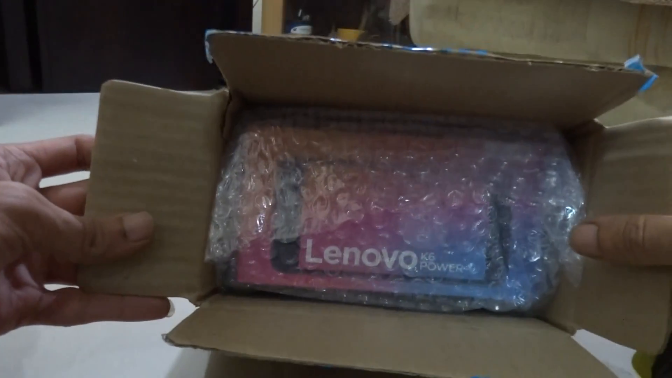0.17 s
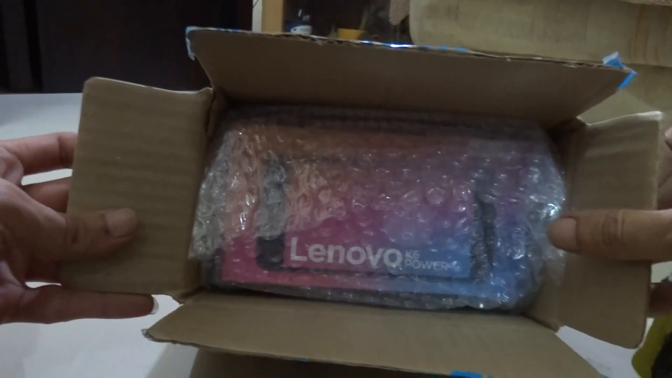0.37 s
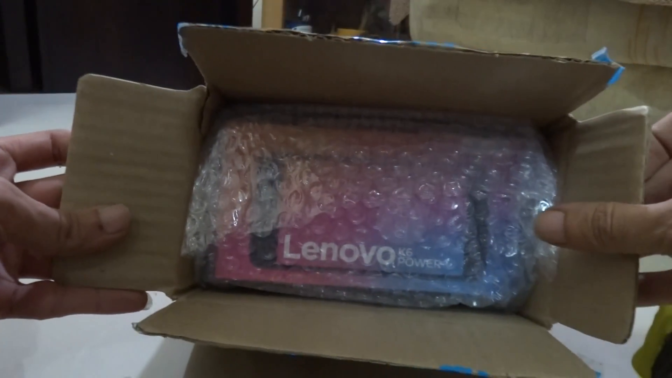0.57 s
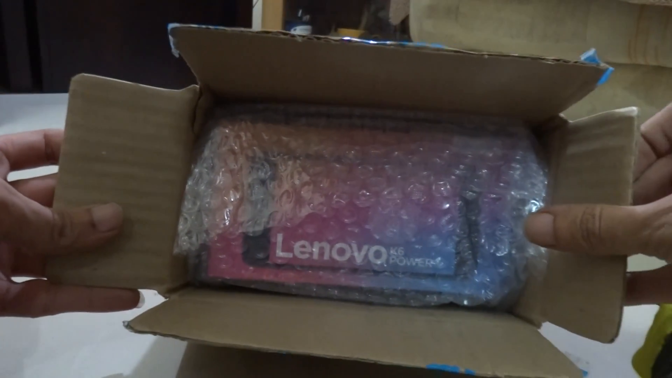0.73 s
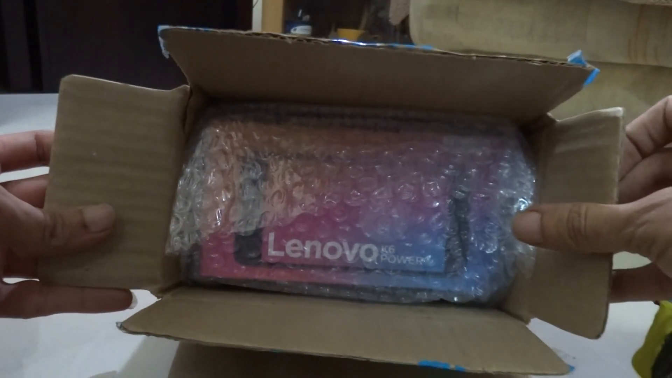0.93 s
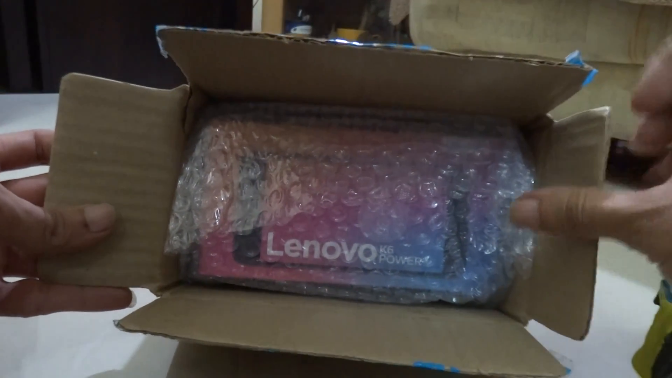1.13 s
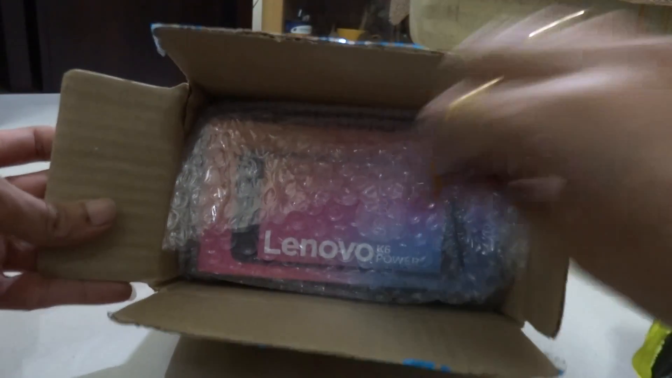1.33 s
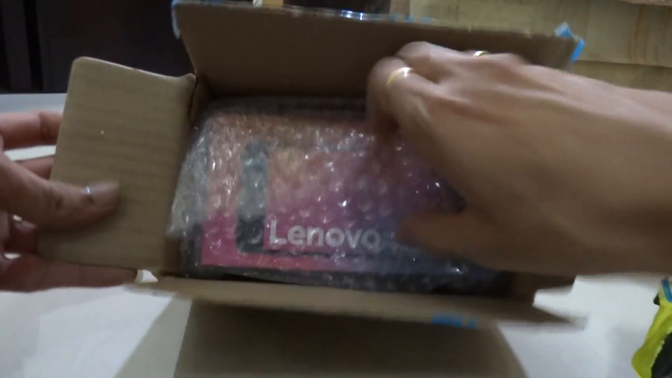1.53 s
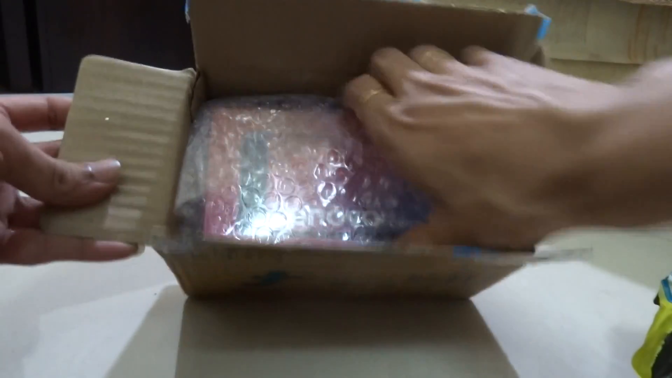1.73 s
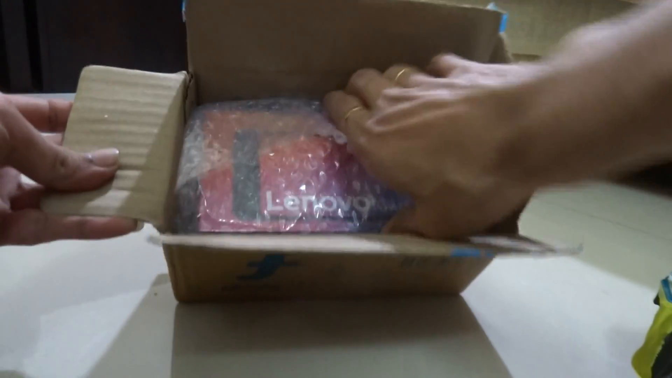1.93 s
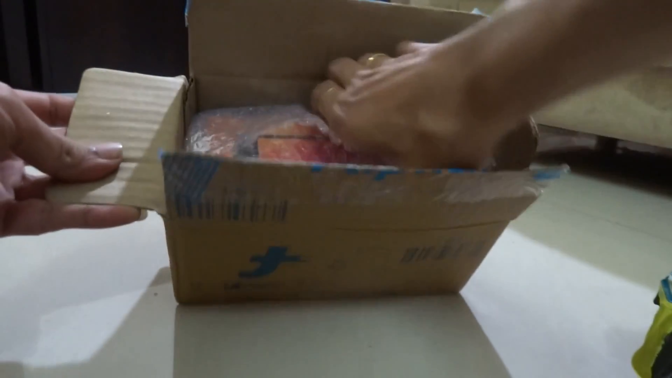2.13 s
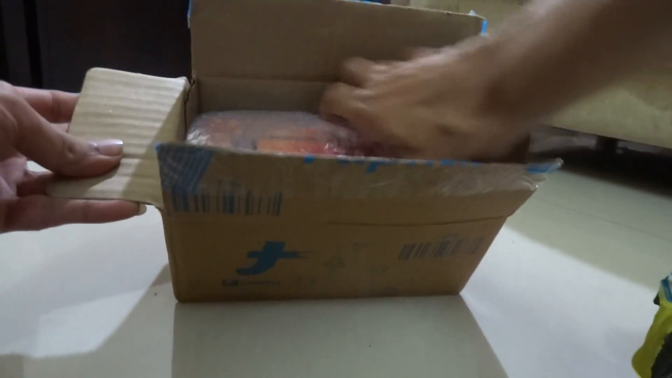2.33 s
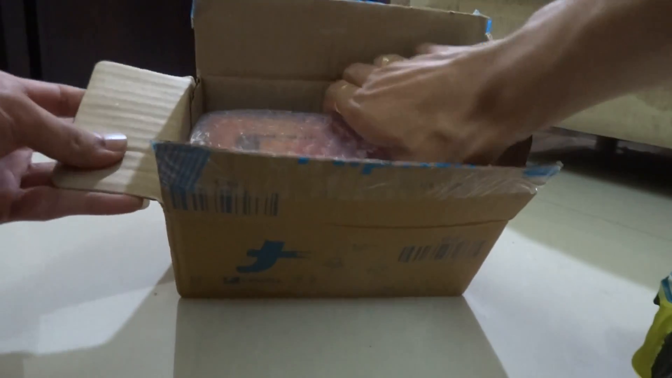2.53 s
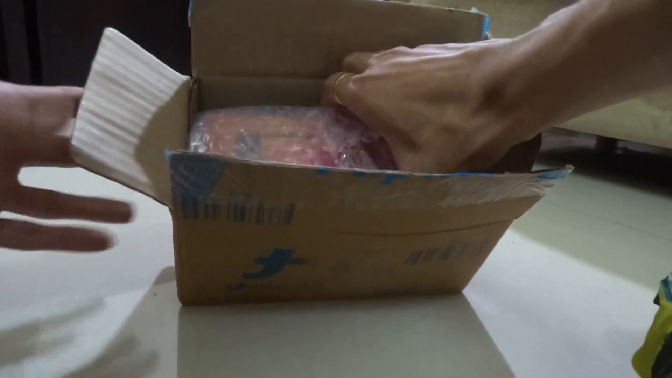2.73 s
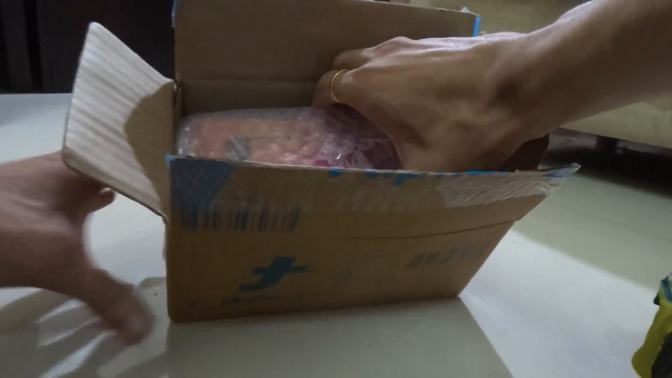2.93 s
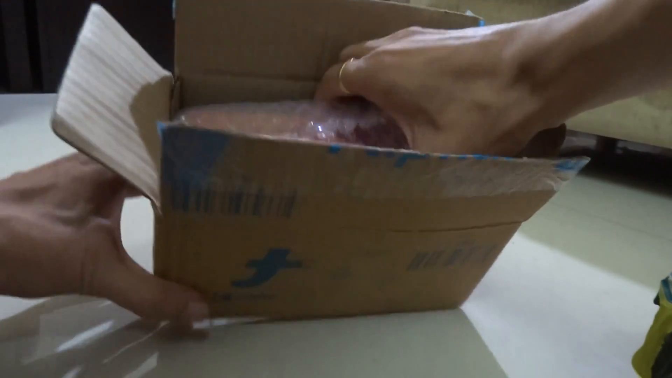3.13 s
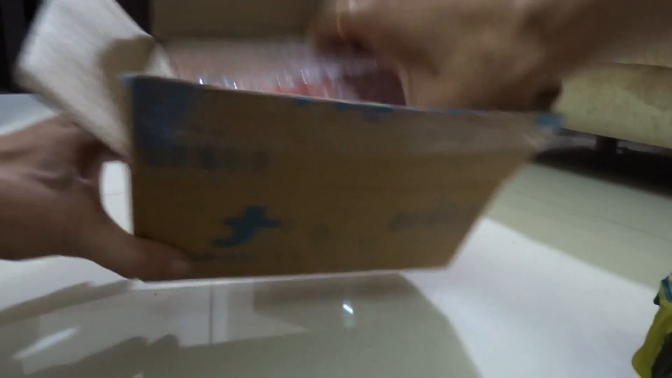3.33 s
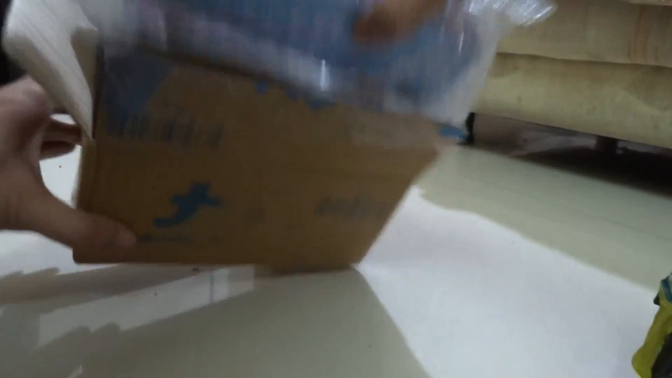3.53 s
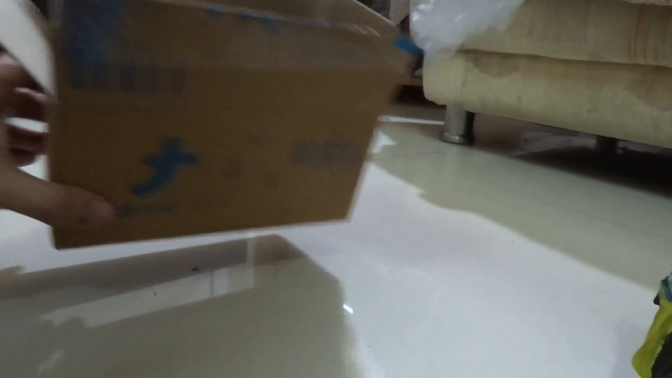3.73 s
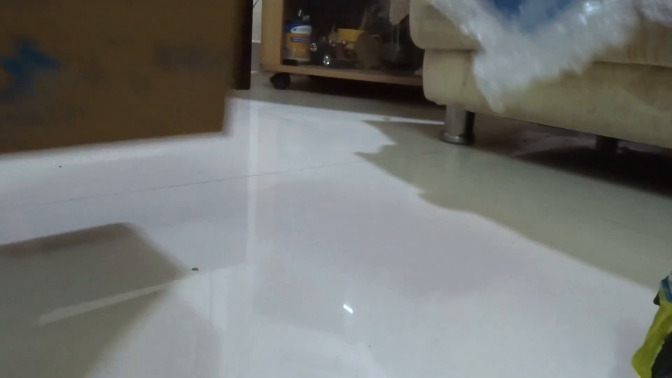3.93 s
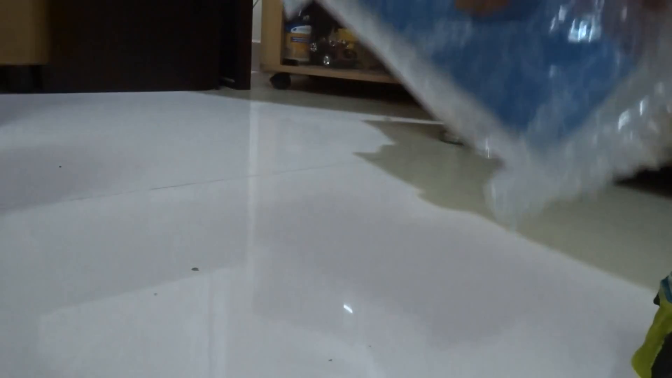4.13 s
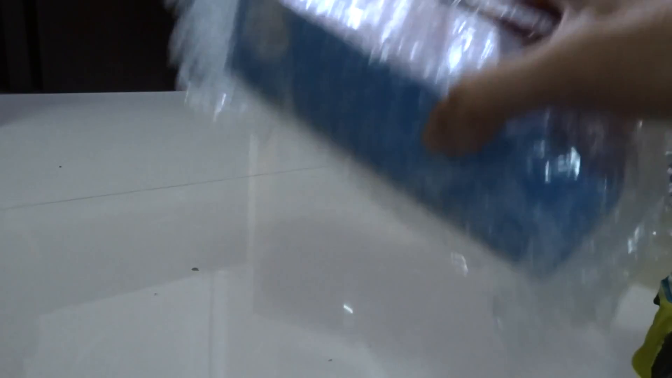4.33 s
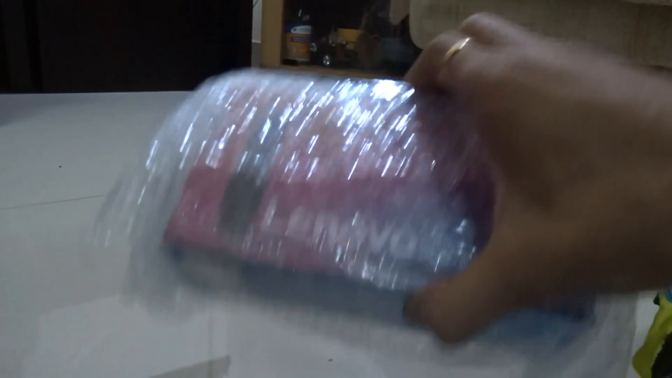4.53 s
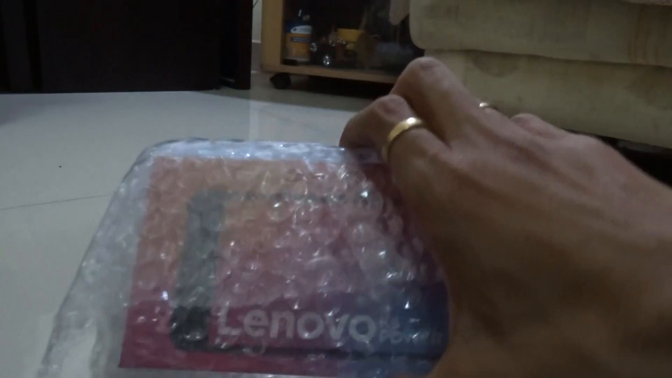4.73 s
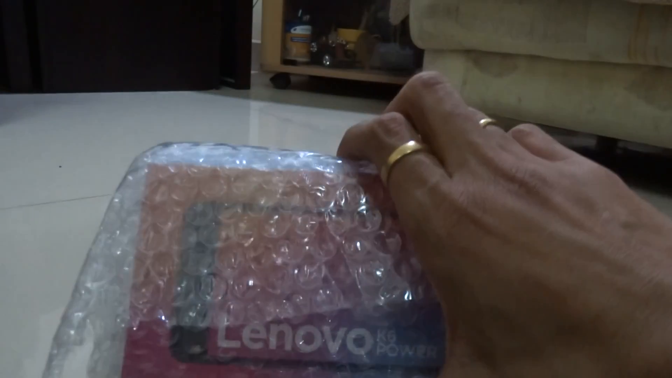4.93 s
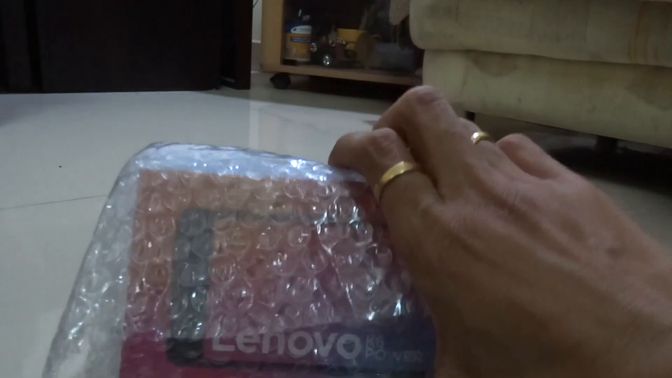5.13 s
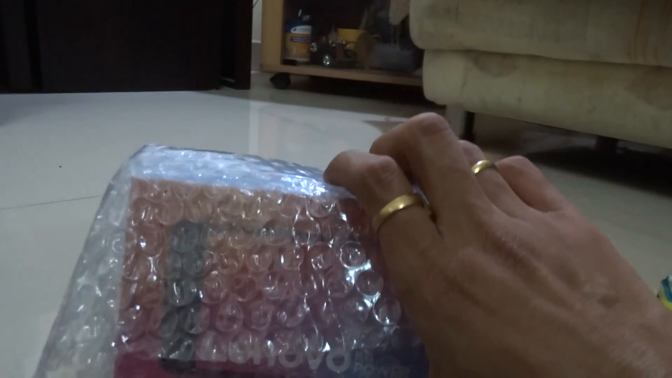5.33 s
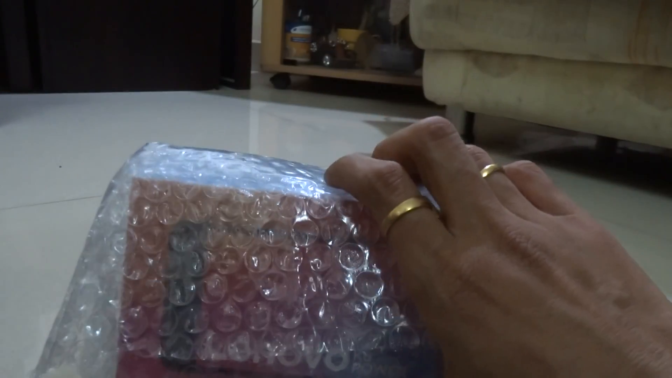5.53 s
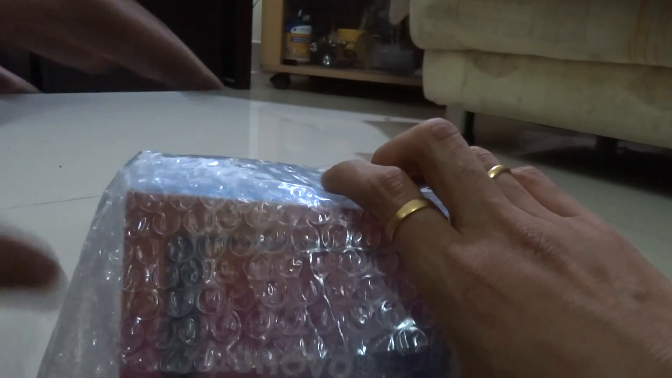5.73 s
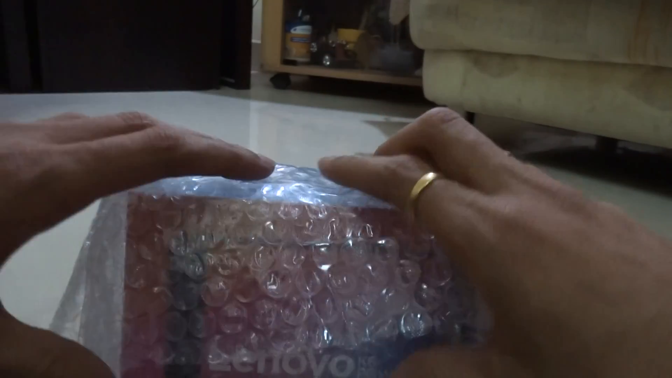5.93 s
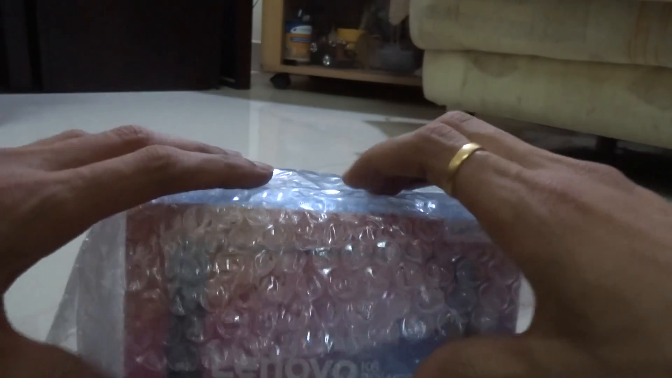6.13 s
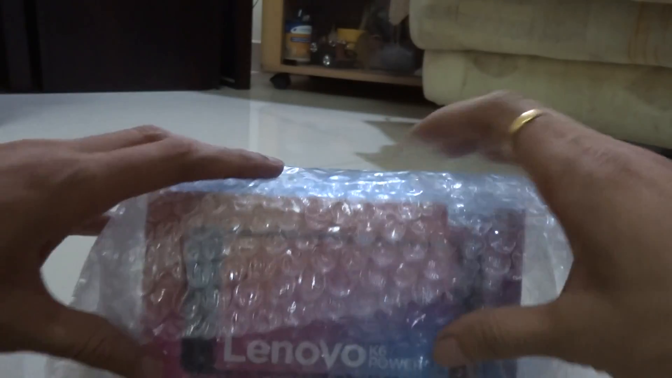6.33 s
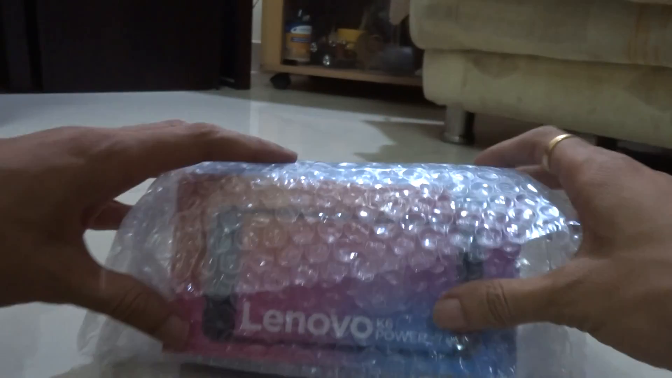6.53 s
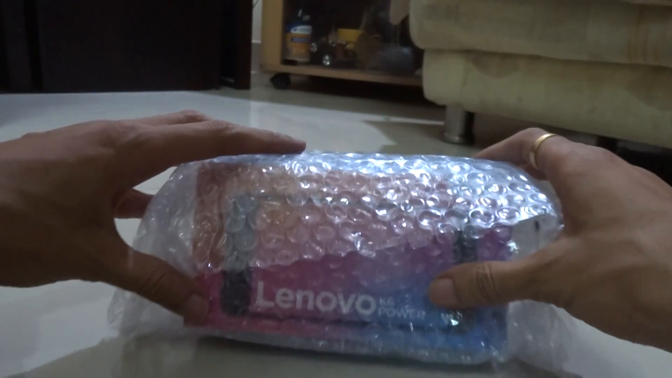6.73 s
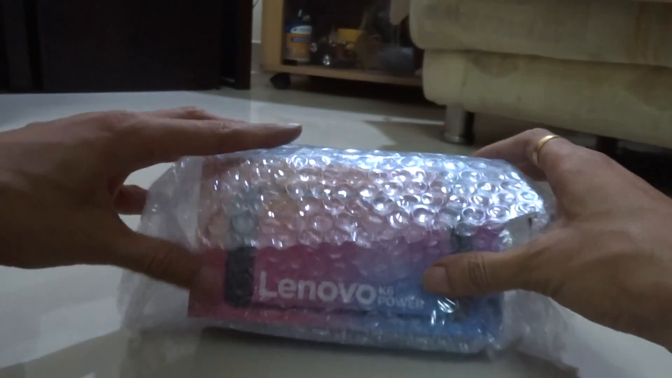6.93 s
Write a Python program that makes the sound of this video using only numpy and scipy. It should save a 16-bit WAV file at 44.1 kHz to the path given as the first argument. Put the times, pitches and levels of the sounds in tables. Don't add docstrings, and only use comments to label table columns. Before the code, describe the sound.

Bubble wrap crackles and snaps sharply as a parcel is pulled from a knocking cardboard carton, then set down on a tiled floor and turned.

```python
import sys
import numpy as np
from scipy import signal
from scipy.fft import rfft, irfft
from scipy.io import wavfile

SR = 44100
rng = np.random.default_rng(int(sys.argv[2]) if len(sys.argv) > 2 else 0)


def unload_audio(sound):
    columns = np.transpose(np.atleast_2d(sound))
    steps = np.round(np.clip(columns, -1, 1) * 32767)
    wavfile.write(sys.argv[1], SR, steps.astype(np.int16))


def to_linear_factor(level_db):
    exponent = np.asarray(level_db, float) / 20
    return 10 ** exponent


N = 311787
SET_DOWN_S = 4.47

# (time [s], level [dB])
DRAG_LEVEL = [(1.375, -104), (1.397, -51.5), (1.57, -54.5)]


def rms_one(x):
    return x / np.sqrt(np.mean(x ** 2) + 1e-20)


def in_time(rows):
    s, *columns = np.transpose(rows)
    return [np.interp(np.arange(N) / SR, s, c, left=-150, right=-150) for c in columns]


def at_hz(points, hz):
    point_hz, point_db = np.array(points)[:, 0], np.array(points)[:, 1]
    return np.interp(np.log(hz), np.log(point_hz), point_db)


def colour(x, spectrum):
    hz = np.maximum(np.arange(N // 2 + 1) * SR / N, 1)
    return irfft(rfft(x) * to_linear_factor(at_hz(spectrum, hz)), N)


def band_pass(x, order, low_hz, high_hz):
    return signal.sosfilt(signal.butter(order, [low_hz, high_hz], "band", fs=SR, output="sos"), x)


def drift(rate):
    r = np.exp(-32 * np.pi * rate / SR)
    slow = signal.lfilter([1], [1, -2 * r, r * r], rng.standard_normal(N // 16 + 2002))[2000:]
    return np.interp(np.arange(N) / 16, np.arange(len(slow)), rms_one(slow))


def resonate(x, hz, width_hz):
    r = np.exp(-np.pi * width_hz / SR)
    top = np.array([1, 0, -1]) * (1 - r * r) / 2
    return signal.lfilter(top, [1, -2 * r * np.cos(2 * np.pi * hz / SR), r * r], x)


def grains(per_s, spread_db):
    size_db = spread_db * np.minimum(rng.exponential(1, N), 3)
    sizes = to_linear_factor(size_db) * rng.choice([-1, 1], N)
    return rms_one(sizes * (rng.random(N) < per_s / SR) + 1e-18)


def quiet_room():
    # (frequency [Hz], level [dB])
    hum = [(196, -90), (441, -82.5), (491, -77)]
    # (frequency [Hz], level [dB per Hz])
    air = [(18, -24), (65, -20.5), (190, -12.5), (370, -13.5), (600, -9.5), (1050, -12), (2100, -7.5),
           (2900, -11), (5600, -11.5), (6500, -6.5), (8500, -6), (11000, -21), (16000, -44)]
    air_db = -65
    t = np.arange(N) / SR
    drone = 0
    for hz, db in hum:
        level = to_linear_factor(db + 2.5 + 2.0 * drift(11.0))
        drone = drone + level * np.sin(2 * np.pi * hz * t + 0.45 * drift(7.2))
    return to_linear_factor(air_db) * rms_one(colour(rng.standard_normal(N), air)) + drone


def throb():
    # (time [s], level [dB])
    swell = [(6.46, -81), (6.52, -57), (6.76, -63), (6.95, -69)]
    hz, beats_per_s, peak_s = 496, 16.5, 6.64
    t = np.arange(N) / SR
    beat = 0.25 + np.cos(np.pi * beats_per_s * (t - peak_s)) ** 2
    return to_linear_factor(in_time(swell)[0]) * np.sin(2 * np.pi * hz * t) * beat


def echo(x, t60, delay_s):
    t = np.arange(round(t60 * SR)) / SR
    tail = rng.standard_normal(len(t)) * to_linear_factor(-60 * t / t60) * (t > delay_s)
    return signal.fftconvolve(x, tail / np.sqrt(np.sum(tail ** 2)))[:N]


def port_difference(mid):
    # (frequency [Hz], difference over common sound [dB])
    port_gap = [(30, -6), (100, -22), (250, -21.5), (700, -14), (2400, -15.5), (4400, -19), (7500, -29.5),
                (9300, -20), (10500, -6.5), (12500, -14), (15000, -15)]
    centred_db = np.interp(np.arange(N) / SR, [1.4, 1.6, 3.65, 3.8], [5.0, -4.5, -5.5, 2.5])
    return to_linear_factor(centred_db) * colour(echo(mid, 0.029, 0), port_gap)


def strike(rows, bright):
    out, t = np.zeros(N + 8192), np.arange(8192) / SR
    for (s, peak_db, hz, t60), (r1, r2) in zip(rows, rng.uniform(0.79, 1.1, (len(rows), 2))):
        tones = np.sin(2 * np.pi * hz * t)
        tones = tones + bright * 0.5 * np.sin(2 * np.pi * 2.5 * r1 * hz * t)
        tones = tones + bright * 0.85 * np.sin(2 * np.pi * 2.8 * r2 * hz * t)
        push = 1 - np.exp(-t / (0.00097 + 0.43 / hz))
        i = round(s * SR)
        out[i:i + 8192] += to_linear_factor(peak_db + 4.5 - 60 * t / max(t60, .005)) * push * tones
    return out[:N]


def panel_taps():
    # (time [s], peak [dB], pitch [Hz], time to fall 60 dB [s])
    taps = [(1.558, -32.5, 314, 0.032), (2.375, -46.5, 323, 0.092), (3.445, -43, 141, 0.033),
            (4.09, -51, 1300, 0.023), (4.175, -43, 1320, 0.014), (0.675, -52, 312, 0.069),
            (1.78, -44.5, 340, 0.029), (1.838, -40.5, 277, 0.052), (1.992, -37, 346, 0.05),
            (2.13, -40, 770, 0.086), (2.115, -39.5, 1330, 0.1), (3.036, -49, 490, 0.03),
            (3.158, -49, 910, 0.02), (3.425, -38, 1330, 0.21), (3.452, -39.5, 414, 0.057),
            (3.51, -35, 305, 0.067), (3.515, -48, 192, 0.27), (3.808, -38, 1330, 0.022),
            (5.17, -58, 300, 0.037), (5.32, -51, 1270, 0.17), (6.68, -43, 943, 0.056),
            (3.65, -58, 165, 0.064), (3.705, -31, 1266, 0.042), (3.213, -28.5, 2040, 0.023)]
    return signal.sosfilt(signal.butter(4, 110, "high", fs=SR, output="sos"), strike(taps, 0.54))


def thuds():
    # (time [s], peak [dB], pitch [Hz], time to fall 60 dB [s])
    thud_rows = [(1.558, -24, 926, 0.018), (1.668, -44.5, 1140, 0.17), (1.836, -25.5, 888, 0.022),
                 (1.987, -35, 1050, 0.033), (2.028, -43, 260, 0.19), (2.33, -44, 800, 0.022),
                 (2.372, -30.5, 820, 0.029), (2.559, -47, 850, 0.084), (2.81, -47, 411, 0.073),
                 (3.056, -47, 820, 0.024), (3.447, -38, 829, 0.034), (3.502, -27, 515, 0.028),
                 (3.519, -46, 794, 0.046), (3.71, -31, 757, 0.034), (4.485, -37, 1274, 0.019),
                 (5.316, -60, 787, 0.031), (5.465, -44, 1170, 0.035), (5.605, -41.5, 900, 0.027),
                 (6.153, -40, 986, 0.047), (6.397, -40.5, 900, 0.03)]
    return strike(thud_rows, 0.9)


def stroke(curve, modes, flutter_db):
    friction = grains(6000, 3.3) * to_linear_factor(flutter_db * drift(43))
    body = 0
    for k, (hz, width, db) in enumerate(modes):
        ring = resonate(np.roll(friction, 97 * k), hz, width)
        body = body + to_linear_factor(db) * ring * np.sqrt(modes[0][1] / width)
    return to_linear_factor(in_time(curve)[0]) * rms_one(body)


def flap_rub():
    # (time [s], level [dB])
    rub = [(0.47, -99), (0.5, -56.5), (0.625, -47), (0.66, -37), (0.74, -41), (0.874, -60), (0.94, -66)]
    # (frequency [Hz], width [Hz], level [dB])
    flap = [(829, 175, 9.5), (1680, 43, 0), (2760, 400, 2), (3300, 1800, 0.5), (4940, 60, -6),
            (6780, 80, -5), (7300, 2400, 6), (1110, 300, 1)]
    return signal.lfilter(*signal.butter(2, 8500, fs=SR), stroke(rub, flap, 1.0))


def finger_slide():
    # (time [s], level [dB])
    slide = [(1.06, -88), (1.15, -56.5), (1.25, -54.5), (1.36, -95)]
    # (frequency [Hz], width [Hz], level [dB])
    finger = [(2200, 330, -3), (3740, 540, -5.5), (5100, 450, -9), (8700, 1800, 6), (12000, 3000, -18)]
    return stroke(slide, finger, 0.81)


def carton_drag():
    # (frequency [Hz], width [Hz], level [dB])
    base = [(216, 14, -18), (1050, 370, -5.5), (1480, 44, -3), (1730, 80, 2), (2170, 70, -1),
            (2600, 140, -6), (4430, 900, -16)]
    return stroke(DRAG_LEVEL, base, 0.77)


def drag_song():
    # (frequency [Hz], level over the drag [dB])
    song = [(927, -0.5), (1174, 4)]
    t = np.arange(N) / SR
    tones = 0
    for hz, db in song:
        level = to_linear_factor(db + 1.8 * drift(25))
        tones = tones + level * np.sin(2 * np.pi * hz * t + 0.69 * drift(24))
    return to_linear_factor(in_time(DRAG_LEVEL)[0]) * tones


def film_squeak():
    # (time [s], level [dB])
    squeak_level = [(4.15, -68), (4.2, -53), (4.3, -48.5), (4.42, -72)]
    # (frequency [Hz], width [Hz], level [dB])
    squeak = [(3165, 35, 0.5), (3440, 60, 3.5), (4100, 240, 1), (2710, 35, -9), (2200, 40, -15)]
    return stroke(squeak_level, squeak, 1.4)


def parcel_slide():
    # (time [s], level [dB])
    creep = [(4.75, -79), (4.93, -57), (4.99, -59)]
    # (frequency [Hz], width [Hz], level [dB])
    parcel = [(715, 54, 0)]
    return stroke(creep, parcel, 2.9)


def wall_rub():
    # (frequency [Hz], width [Hz], level [dB])
    wall = [(782, 42, 4.5), (1320, 30, -1.5), (278, 45, -7), (587, 60, -13.5)]
    rub = [(s, wall_db - 8.0) for s, _, _, wall_db, *_ in handling() if s < SET_DOWN_S]
    return stroke(rub, wall, 2.3)


def handling():
    # (time [s], film [dB], rise [s per 10 dB], fall [s per 10 dB], weight on the carton [dB])
    tugs = [(1.4, -51.5, -1.5, 0.5, -13), (1.47, -25, -0.1654, -0.27, -17), (1.58, -39.5, -0.24, 0.14, 11),
            (1.77, -36.5, 0.12, 0.1, -15), (1.847, -35.5, 0.02, 0.07, 9), (2, -39, 0.1, 0.2, 16),
            (2.08, -42.5, 0.05, 0.45, 23), (2.148, -36, 0.16, 0.01, 15), (2.376, -30, 0.026, 0.0855, 4),
            (2.442, -31.5, 0.08, -0.01, -12), (2.568, -39, 0.1, 0.2, 3), (2.67, -47, 0, 0.08, -54),
            (2.813, -38.5, -0.02, 0.07, 0), (2.88, -46.5, -0.46, 0.24, -10), (2.955, -48.5, 0, 0.1, -1),
            (3.05, -32.5, 0.02, 0, -4), (3.212, -37.5, 0.05, 0.05, -6.5), (3.28, -65, -2, -4, -18),
            (3.36, -34.5, -0.01, 0.06, -12), (3.464, -25.5, 0.0871, 0.09, -14),
            (3.514, -33.5, 0.0852, 0.1468, 12), (3.63, -41.5, 0.08, 0.19, -4), (3.709, -32, 0.08, 0.03, -7),
            (3.81, -52.5, 1, 0.5, 7)]
    squeezes = [(4.0, -55, 0.14, 0.092, -14), (4.13, -49, 0.028, 0.44, -27), (4.32, -48, 0.31, 0.18, 8),
                (4.497, -32, 0.0098, 0.07, -15), (4.62, -45.5, 0.13, 0.34, -4),
                (4.83, -39.5, 0.27, 0.19, -40), (5.05, -45, 0.35, 0.1, -17),
                (5.208, -39.5, 0.082, 0.058, -6), (5.33, -42, 0.1, 0.12, -4),
                (5.515, -37.5, 0.096, 0.064, -9), (5.62, -43.5, 0.22, 0.46, -14),
                (5.88, -42.5, 0.22, 0.2, -5.5), (6.18, -37.5, 0.2, 0.43, 2.5), (6.5, -51, 0.15, 1, 0),
                (6.7, -39.5, 0.33, 0.27, -13), (7.07, -38.5, 0.2, .1, -32)]
    # (time [s], palm contact [dB], crispness [0-1])
    grip = [(1.37, -13, 0.3), (1.55, -3, 0.98), (1.72, 6.5, 0.66), (2.15, -3, 0.9), (2.37, -6.5, 0.93),
            (2.52, -1, 0.87), (2.9, -1.5, 0.93), (3.05, -6, 0.77), (3.18, 0, 0.55), (3.45, -2, 0.44),
            (3.8, -5.5, 1), (4.1, -19.5, 0.85), (4.35, -20.5, 0.46), (4.6, -16, 0.6), (4.74, -2.5, 0.1),
            (5.25, -1.5, 0.76), (6.7, 1.5, 0.4), (7.08, -0.5, 0.78)]
    # (offset [dB], share of weight, share of palm, steepness)
    answers = [
        (0.0, 0.0046, 0.069, 1.26),
        (0.53, 0.041, 0.72, 1.24),
        (-9, 0.16, 0.67, 1.37),
        (-21, 0.79, 0.56, 2.1),
    ]
    s = np.arange(grip[0][0], N / SR + .004, .004)
    at, film_db, rise, fall, weight_db = np.array([*tugs, *squeezes]).T[:, :, None]
    before = (at - s) / np.maximum(rise, 1e-3)
    after = (s - at) / np.maximum(fall, 1e-3)
    away = np.where(s < at, before, after)
    grip_s, *grip_columns = np.array(grip).T
    palm_db, crisp = (np.interp(s, grip_s, c) for c in grip_columns)
    zones = []
    for offset_db, heavy, palm, steep in answers:
        gestures = to_linear_factor(film_db + heavy * weight_db - 10 * steep * away)
        total_db = 20 * np.log10(np.linalg.norm(gestures, axis=0))
        zones.append(total_db + offset_db + palm * palm_db)
    return np.transpose([s, *zones, crisp])


def crackle(per_s, spread_db, fade_s):
    clumps = to_linear_factor(np.clip(6.5 * drift(34), -20, 6))
    clicks = np.abs(grains(per_s, spread_db)) * clumps
    return rms_one(signal.lfilter([1], [1, -np.exp(-1 / (fade_s * SR))], clicks))


def crinkle():
    centres_hz = (7000, 2800, 1050, 300, 13000)
    # (time [s], level [dB])
    sheen = [(1.4, -21), (1.6, -18.5), (2.6, -17.5), (3.5, -12), (3.9, -17), (4.1, -33), (4.45, -57),
             (4.6, -28.5), (7.07, -32.5)]
    # (frequency [Hz], level [dB per Hz])
    in_carton = [(59, -58), (100, -40), (185, -9), (219, -16), (277, -5), (634, -7.5), (818, -10),
                 (1080, -9), (1310, -5), (4200, -1.5), (7770, 10.5), (9210, -4), (14700, -31), (16000, -31)]
    free_wrap = [(59, -75), (100, -90), (266, -22.5), (461, -18.5), (492, -14.5), (547, -16), (801, -4),
                 (1360, -4), (3190, -1), (4470, -1.5), (8280, 8.5), (12000, -22.5), (15500, -22)]
    crease_low_hz = 695
    *zone_db, crisp = in_time(handling())
    zone_db.append(zone_db[0] + in_time(sheen)[0])
    crisp = np.clip(crisp, 0, 1)
    order = np.argsort(centres_hz)
    zone_hz, zone_db = np.array(centres_hz)[order], np.array(zone_db)[order]
    zone_width_hz = np.array([470, 1200, 2700, 5500, 5000])
    per_hz_db = zone_db - 10 * np.log10(zone_width_hz)[:, None]
    small, large = crackle(600, 5.0, .00025), crackle(400, 3.0, .0008)
    white = rng.standard_normal((2, N))
    edges = 87.3 * 2 ** np.arange(0, 7.7, 1 / 3)
    freed = np.arange(N) > SET_DOWN_S * SR
    out = 0
    for k, (low, high) in enumerate(zip(edges, edges[1:])):
        hz = np.sqrt(low * high)
        place = np.interp(np.log(hz), np.log(zone_hz), np.arange(5))
        a = min(int(place), 3)
        share = place - a
        glide = (1 - share) * per_hz_db[a] + share * per_hz_db[a + 1]
        bend = []
        for c in (in_carton, free_wrap):
            straight = (1 - share) * at_hz(c, zone_hz[a]) + share * at_hz(c, zone_hz[a + 1])
            bend.append(at_hz(c, hz) - straight)
        level_db = glide + np.where(freed, bend[1], bend[0]) + 10 * np.log10(high - low)
        fine = np.clip(np.log2(hz / 1500) / 2.74, 0, 1)
        sharp = crisp ** 2 * min(hz / crease_low_hz, 1) ** 2
        small_power = (small ** 2 + np.roll(small, 3001 * (k // 2)) ** 2) / 2
        large_power = np.roll(large, 5003 * (k // 3)) ** 2
        creases = fine * small_power + (1 - fine) * large_power
        drive = white[k % 2] * np.sqrt(sharp * creases + 1 - sharp)
        waver_db = 0.9 * drift(34) + 1.5 * drift(6.0)
        out = out + to_linear_factor(level_db - 0.5 + waver_db) * rms_one(band_pass(drive, 2, low, high))
    return out


def small_snaps():
    per_s, over_film_db, spread_db = 170, 8, 3.5
    low_hz, high_hz = 1700, 9300
    s, film_db, *_, crisp = handling().T
    when, size, pitch = rng.random((round((s[-1] - s[0]) * per_s), 3)).T
    when = s[0] + when * (s[-2] - s[0])
    crisp_film_db = film_db + 20 * np.log10(np.clip(crisp, .05, 1))
    peak_db = np.interp(when, s, crisp_film_db) + over_film_db
    peak_db = peak_db - spread_db * np.log(np.maximum(size, 0.2))
    return list(zip(when, peak_db, low_hz + (high_hz - low_hz) * np.sqrt(pitch)))


def snaps():
    # (time [s], peak [dB], pitch [Hz])
    flap_ticks = [
        (0.1014, -41.5, 7500),
        (0.2778, -47, 5060),
        (0.4863, -38, 7000),
        (0.2, -50, 6000),
        (0.9478, -44, 3820),
        (0.9576, -38.5, 6800),
        (1.0397, -38, 6960),
    ]
    # (time [s], peak [dB], pitch [Hz])
    film_snaps = [(1.4183, -28, 7450), (1.4651, -28, 4540), (1.5597, -17.5, 2300), (1.5951, -12.5, 7700),
                  (1.671, -23.5, 2600), (1.7099, -8.5, 7800), (1.762, -18, 7950), (1.769, -15.5, 7300),
                  (1.797, -16.5, 8000), (1.838, -12, 3240), (1.966, -23.5, 1760), (1.985, -11.5, 6500),
                  (1.9916, -13, 2690), (2.002, -17, 3330), (2.0238, -26, 2430), (2.0926, -24, 4400),
                  (2.1378, -15, 4460), (2.145, -14.5, 5630), (2.186, -18, 8260), (2.248, -21, 9300),
                  (2.348, -16, 8000), (2.4, -15, 7700), (2.4255, -11, 8100), (2.442, -13, 6250),
                  (2.4952, -21, 7700)]
    lift_snaps = [(2.5625, -9.5, 8360), (2.568, -15, 7500), (2.601, -11, 8500), (2.655, -20.5, 7600),
                  (2.661, -13.5, 7860), (2.6762, -19, 7400), (2.7262, -17.5, 7400), (2.7637, -18, 7600),
                  (2.846, -19, 6760), (2.874, -20, 4600), (2.906, -25, 8300), (2.95, -14, 8740),
                  (3.018, -30.5, 4500), (3.081, -18.5, 7500), (3.2173, -8, 8700), (3.2256, -18.5, 6960),
                  (3.362, -13, 8100), (3.705, -10.5, 8100), (3.7124, -6.5, 7440), (3.778, -28, 5310),
                  (3.7969, -25.5, 2920), (3.878, -20, 4400), (3.912, -39, 4870), (3.9284, -18, 5030),
                  (3.977, -20.5, 5470), (4.0321, -23.5, 8700), (4.089, -30.5, 3200), (4.171, -29, 8650),
                  (4.3287, -23, 6700)]
    floor_snaps = [(4.4872, -14, 5470), (4.4994, -15.5, 6470), (4.679, -29.5, 3700), (4.973, -26, 4560),
                   (5.169, -24.5, 3120), (5.273, -21, 7060), (5.28, -17, 3300), (5.291, -14.5, 7100),
                   (5.2963, -13, 6130), (5.498, -23, 7000), (5.5114, -20, 7200), (5.5795, -24.5, 2800),
                   (5.609, -20.5, 2620), (6.0576, -20.5, 2430), (6.1238, -19, 3300), (6.156, -18.5, 6030),
                   (6.175, -21.5, 6060), (6.183, -19.5, 7300), (6.21, -24.5, 3500), (5.965, -28, 2640),
                   (6.021, -44, 3100), (6.2398, -22, 3100), (6.675, -22, 4380), (6.919, -29, 3230),
                   (6.9677, -22, 7650)]
    more_dig_snaps = [(1.4853, -33, 7300), (1.4997, -29, 8300), (1.545, -37, 4100), (1.5749, -17.5, 7900),
                      (1.5866, -23, 7800), (1.6089, -33, 6200), (1.6142, -25, 6800), (1.6889, -27, 6600),
                      (1.729, -25.5, 2440), (1.743, -20, 7200), (1.7805, -21, 8100), (1.789, -21, 7400),
                      (1.8084, -20, 6600), (1.823, -21, 5400), (1.911, -23, 7000), (1.9344, -29, 6200),
                      (2.0195, -26, 3500), (1.976, -23, 6100), (2.0238, -16.5, 7400), (2.0603, -17, 7800),
                      (2.1, -19, 6640), (2.1107, -16.5, 5100), (2.147, -20, 5300), (2.1566, -17, 5040),
                      (2.1983, -17.5, 6900), (2.2243, -22, 7500), (2.2483, -28, 8400), (2.2608, -32.5, 2500),
                      (2.3134, -23.5, 8350), (2.326, -21, 7000), (2.332, -26, 6800), (2.3878, -26, 7000),
                      (2.416, -22, 6800), (2.4316, -22, 8200), (2.458, -18, 3950), (2.4792, -27, 6800),
                      (2.4849, -20.5, 5170)]
    more_lift_snaps = [(2.5017, -22, 7900), (2.527, -28, 1520), (2.568, -14.5, 2670), (2.685, -17, 7500),
                       (2.7075, -34, 8700), (2.741, -39, 7100), (2.7522, -32, 7700), (2.7578, -31, 5000),
                       (2.783, -20, 7100), (2.7931, -32, 2080), (2.8544, -33, 2030), (2.8603, -41, 2620),
                       (2.9598, -28, 7300), (2.9656, -30, 6500), (3.055, -29, 6300), (3.0593, -29.5, 1990),
                       (3.0834, -18, 8900), (3.1068, -35, 2030), (3.233, -26, 3660), (3.24, -23, 7600),
                       (3.2475, -34, 2200), (3.5074, -11, 7300), (3.53, -25, 8000), (3.5835, -16, 7200),
                       (3.6439, -23, 9300), (3.6915, -24, 7300), (3.6999, -30, 2900), (3.782, -24.5, 5300),
                       (3.807, -34, 2920), (3.8277, -31, 8600), (3.8556, -35, 7900), (3.9044, -29, 8400),
                       (3.9441, -33, 4570), (3.986, -29, 8200), (4.1055, -30.5, 6840), (4.1166, -47, 3100),
                       (4.1347, -30.5, 8400), (4.225, -39, 6100), (4.2304, -51, 3200), (4.3558, -43, 3330),
                       (4.3816, -38.5, 8700)]
    more_floor_snaps = [(4.7485, -30.5, 4170), (4.9651, -35, 4500), (5.0375, -38, 6300), (5.0685, -40, 7300),
                        (5.1188, -33, 3070), (5.132, -28, 5700), (5.174, -32, 3500), (5.186, -27.5, 3100),
                        (5.1958, -31, 3300), (5.359, -34, 3600), (5.372, -35, 6400), (5.3832, -29, 2320),
                        (5.4061, -33, 3000), (5.451, -27, 8500), (5.466, -37, 3300), (5.5276, -21, 6900),
                        (5.5695, -25, 7000), (5.597, -26, 7340), (5.695, -26, 7500), (5.744, -31.5, 3900),
                        (5.811, -24, 7000), (5.826, -28, 7500), (5.772, -22, 7700), (5.866, -26.5, 2890),
                        (5.8822, -30, 8000), (6.0817, -23, 7700), (6.1069, -32, 4000), (6.2975, -26, 8240),
                        (6.393, -26, 8500), (6.4021, -41, 3100), (6.416, -26, 8000), (6.4322, -24.5, 7100),
                        (6.4538, -32, 8200), (6.5507, -27, 8500), (6.989, -26, 6640), (7.0056, -24, 6500),
                        (7.0241, -23, 6200), (7.039, -21, 7950), (7.0576, -21, 8000)]
    bounce_s, bounce_db = .0022, -11
    rows = [*flap_ticks, *film_snaps, *lift_snaps, *floor_snaps, *more_dig_snaps, *more_lift_snaps, *more_floor_snaps]
    rows = rows + small_snaps()
    out, t = np.zeros(N + 1024), np.arange(1024) / SR
    for (s, peak_db, hz), hiss in zip(rows, rng.standard_normal((len(rows), 1024))):
        burst = hiss * to_linear_factor(-60 * t / (0.0051 + 9.2 / hz)) + 2.87 * (t == 0)
        pitched = resonate(resonate(burst, hz, 0.46 * hz), hz, 1.13 * hz)
        broad = resonate(resonate(burst, 3000, 12000), 3100, 11200)
        burst = pitched + (0.27 + 0.15 * hiss[-1]) * broad
        i = round(s * SR)
        out[i:i + 1024] += to_linear_factor(peak_db + 1.5) * burst / np.abs(burst).max()
    return out[:N] + to_linear_factor(bounce_db) * np.roll(out, round(bounce_s * SR))[:N]


def scene():
    contacts = snaps() + thuds() + flap_rub() + finger_slide() + carton_drag()
    contacts = contacts + film_squeak() + parcel_slide() + drag_song() + wall_rub()
    near = crinkle() + panel_taps() + band_pass(contacts, 3, 220, 9130)
    room_t60_s, room_db = 0.24, -11.5
    mid = near + to_linear_factor(room_db) * echo(near, room_t60_s, 0.0032) + quiet_room() + throb()
    side = port_difference(mid)
    return np.array([mid + side, mid - side])


def top_cut(x):
    return signal.sosfilt(signal.butter(12, 16470, fs=SR, output="sos"), x)


def record(dry):
    cut = signal.sosfilt(signal.ellip(10, .5, 60, 15800, fs=SR, output="sos"), dry)
    return top_cut(cut)


dry = scene()
out = record(dry)
unload_audio(out)
```